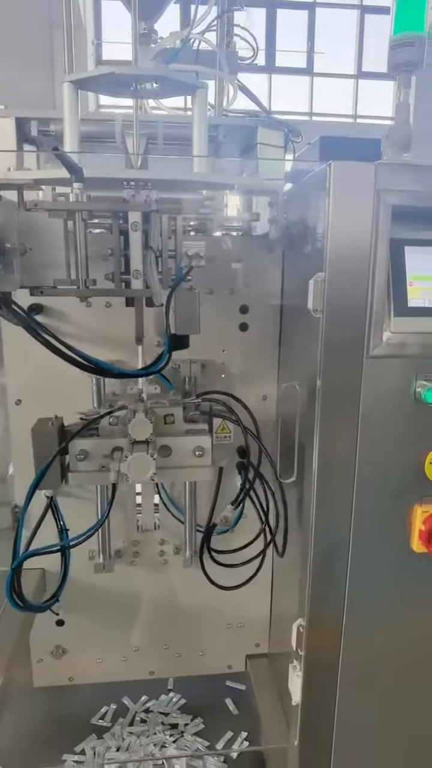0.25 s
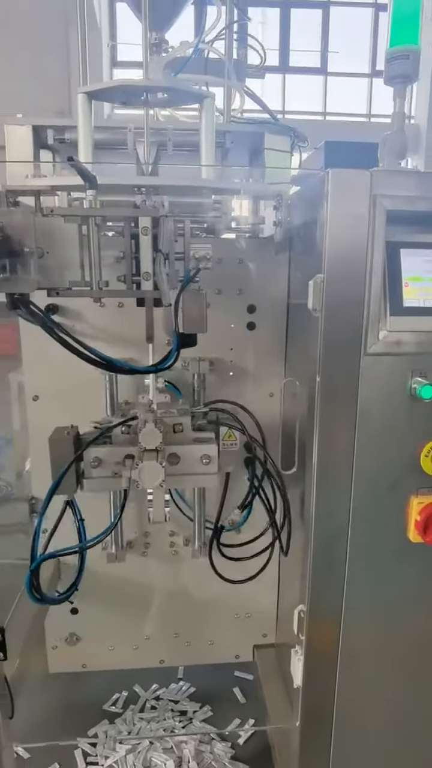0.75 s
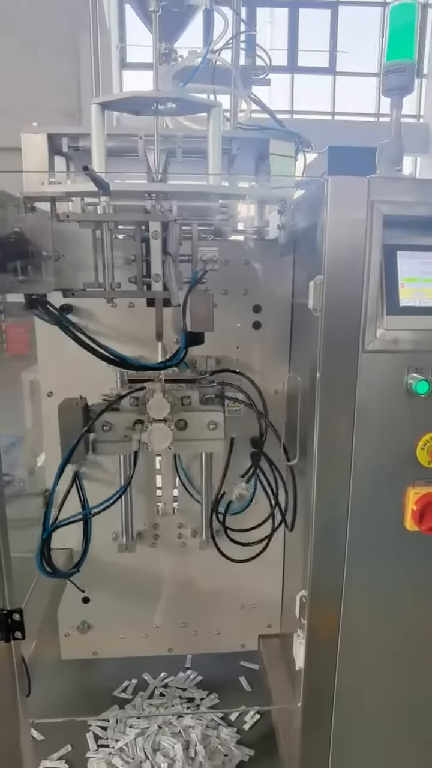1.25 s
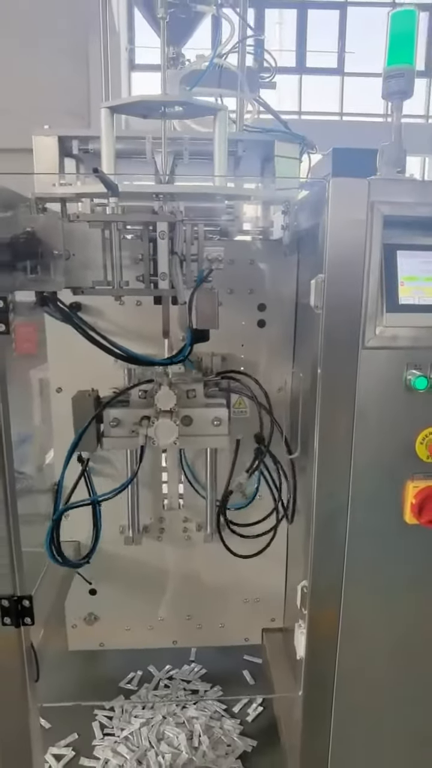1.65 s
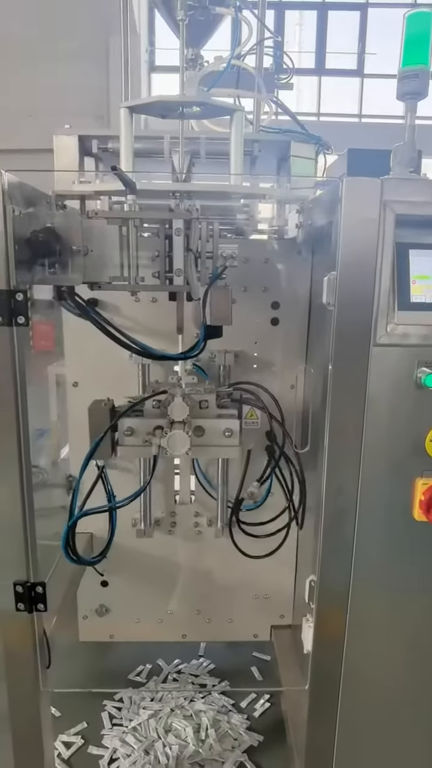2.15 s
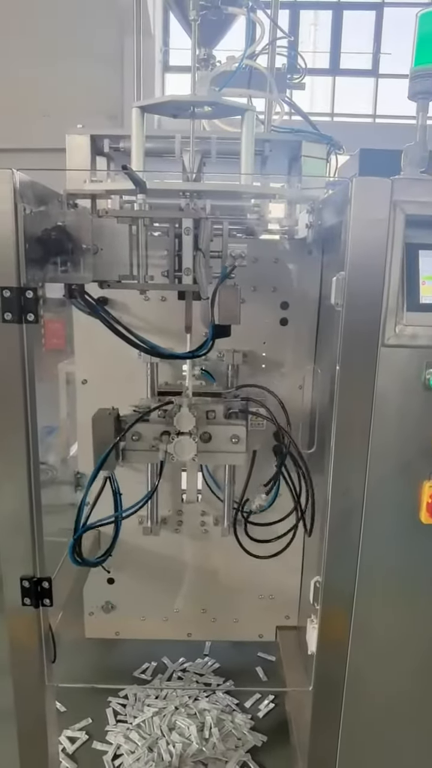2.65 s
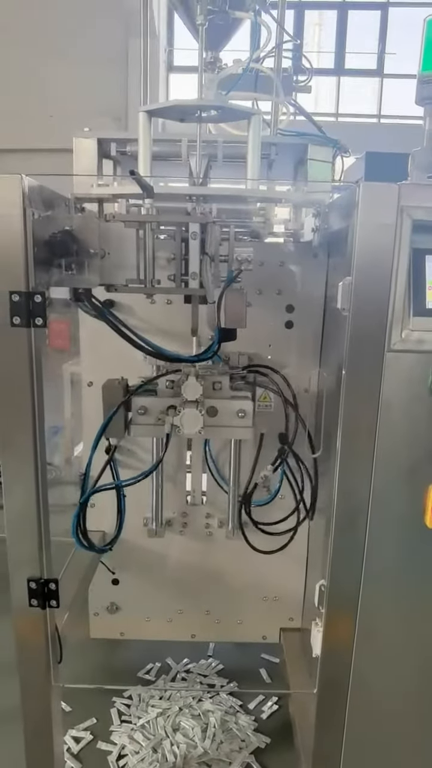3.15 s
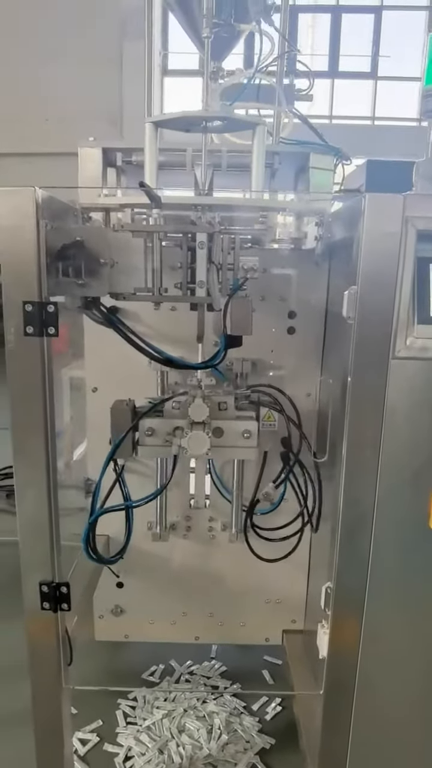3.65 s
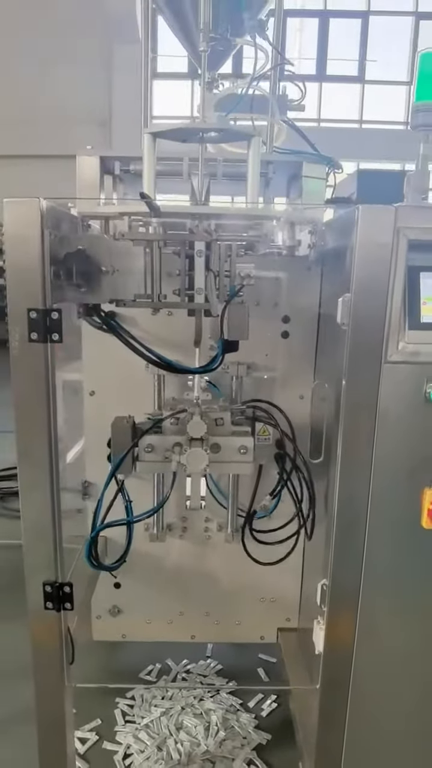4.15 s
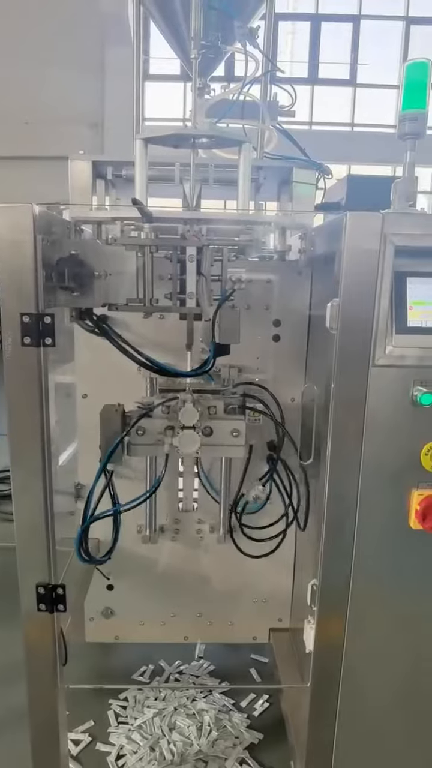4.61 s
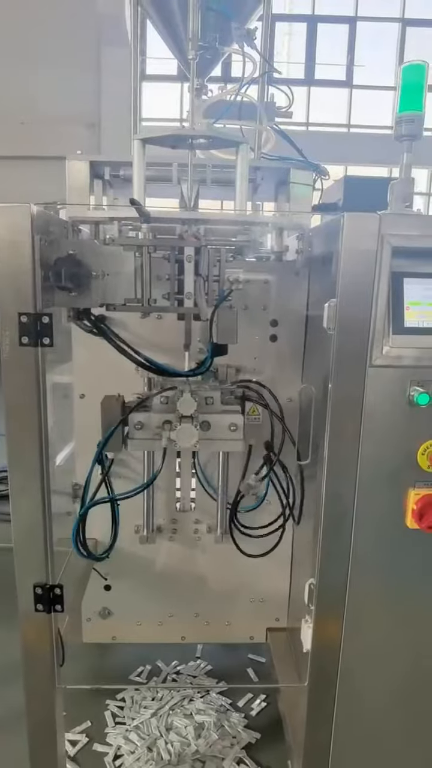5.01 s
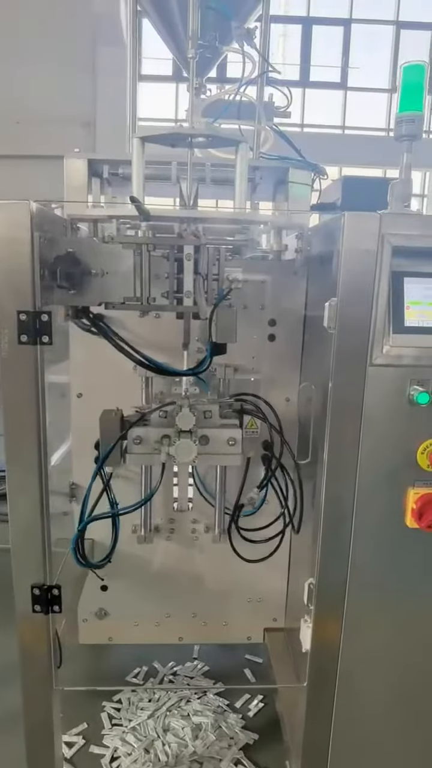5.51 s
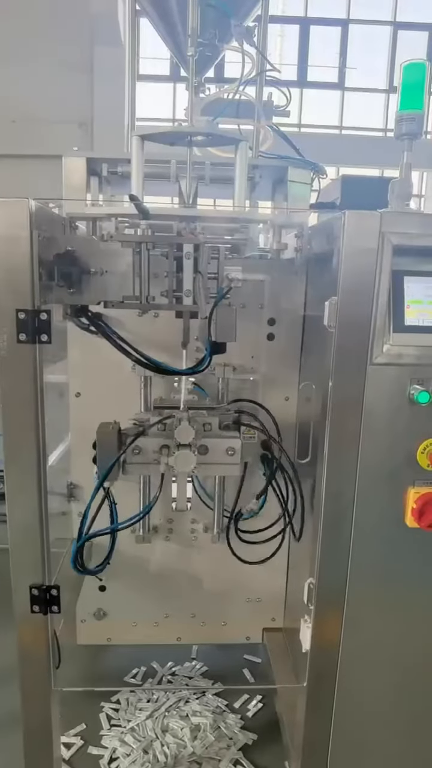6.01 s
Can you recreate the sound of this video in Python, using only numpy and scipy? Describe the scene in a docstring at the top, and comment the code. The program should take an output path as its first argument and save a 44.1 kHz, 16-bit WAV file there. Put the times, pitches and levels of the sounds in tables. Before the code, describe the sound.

Close to a packaging machine in a reverberant factory hall. A low drive rumble swells with each stroke. Every 1.7 seconds a bright metallic knife snap is followed by small hisses and knocks, a sharp blast of vented air, then the steel jaws clack shut with a hard thump. Half a second later they thump open, sometimes with an air puff. Faint squeaks and distant clatter fill the gaps.

```python
"""A stick packing machine, heard close in a factory hall: the drive rumbles in the hush and far clatter.
Pilot valves hiss, the knife snaps, feed knocks and squeaks follow; then a valve vents and the jaws clack shut.
They thump open as an air port puffs, and this repeats about every 1.7 s while the hall rings on.
Air and impacts are shaped noise, frame and steel are damped sine modes, the knife is noise through
resonances, the squeaks are gliding sines, and the hall is a convolved noise tail."""
import sys
import numpy as np
from scipy import signal
from scipy.fft import rfft, irfft, next_fast_len
from scipy.io import wavfile
from scipy.ndimage import uniform_filter1d, map_coordinates

SR = 44100
rng = np.random.default_rng(int(sys.argv[2]) if len(sys.argv) > 2 else 0)


def store_pcm(level_fs):
    """Save levels as 16-bit WAV."""
    pcm = np.round(np.clip(level_fs, -1, 1) * 32767).astype(np.int16)
    wavfile.write(sys.argv[1], SR, np.atleast_2d(pcm).T)


N = 276507
T = np.arange(SR * 4 // 10) / SR  # time axis of one short sound, 0.4 s


def amp(db):
    """Decibels to gain."""
    return 10 ** (np.asarray(db) / 20)


def unit(x):
    """Scale to rms 1."""
    return x / np.sqrt(np.mean(x ** 2) + 1e-20)


def along(points, hz):
    """Read (Hz, value) points on a log frequency axis."""
    point_hz, values = np.transpose(points)
    return np.interp(np.log(hz + 1), np.log(point_hz + 1), values)


def filtered(x, response):
    """Multiply the spectrum of x by a response of frequency."""
    size = next_fast_len(len(x) + 4096)
    spectrum = rfft(x, size) * response(np.fft.rfftfreq(size, 1 / SR))
    return irfft(spectrum, size)[:len(x)]


def noise(spectrum, size=len(T)):
    """Coloured noise of rms 1."""
    white = rng.standard_normal(size)
    return unit(filtered(white, lambda hz: amp(along(spectrum, hz))))


def wobble(rate, size=len(T)):
    """A smooth random curve with rate knots a second."""
    knots = rng.standard_normal(int(size * rate / SR) + 4)
    return map_coordinates(knots, [np.arange(size) * rate / SR])


def add(track, s, sound):
    """Mix a sound into the track at time s, trimmed to the track."""
    start = round(s * SR)
    sound = sound[max(-start, 0):]
    part = track[max(start, 0):][:len(sound)]
    part += sound[:len(part)]


def envelope(attack, hold, t60):
    """Rise, hold, then die away by 60 dB in t60 seconds."""
    return (1 - np.exp(-T / attack)) * amp(-60 * np.maximum(T - hold, 0) / t60)


def ring(modes, attack, scatter_db):
    """A struck body: damped sine modes, each level scattered at random by scatter_db."""
    hz, db, t60 = np.transpose(modes)[..., None]
    t = T[::4]  # the modes are low enough for a quarter of the sample rate
    level_db = db + scatter_db * rng.standard_normal(db.shape)
    swings = amp(level_db - 60 * t / t60) * np.sin(2 * np.pi * hz * t)
    struck = swings.sum(0) * (1 - np.exp(-t / attack))
    return signal.resample_poly(struck, 4, 1)[:len(T)]


def patchy(x, depth_db):
    """Narrow regions of the spectrum swell and fade on their own."""
    z = signal.stft(x, nperseg=4096, noverlap=3072)[2]
    field = uniform_filter1d(rng.standard_normal(z.shape), size=3, axis=0)
    field = uniform_filter1d(field, size=5, axis=1)
    varied = signal.istft(z * amp(depth_db * unit(field)), nperseg=4096, noverlap=3072)[1]
    return unit(varied[:N])


def cabinet(x, wet_db, t60):
    """Quick reflections between the steel panels comb a bright sound."""
    walls = rng.standard_normal(len(T)) * envelope(0.001, 0, t60)
    echo = signal.fftconvolve(x, walls / np.linalg.norm(walls))[:len(x)]
    return (x + amp(wet_db) * echo) / np.hypot(1, amp(wet_db))


def cycle_starts():
    """Each cycle begins with a vent; the machine is already one cycle under way."""
    starts = [row[0] for row in VENTS]
    return [starts[0] - np.mean(np.diff(starts))] + starts


def every_cycle(steps):
    """Repeat (delay, ..) steps in each cycle, as (seconds, ..) rows."""
    return [(start + delay, *rest) for start in cycle_starts() for delay, *rest in steps]


# Load on the drive in each cycle in turn. Each entry: change of its stroke levels in dB.
CYCLE_LOADS = [3, -4.5, 2, 1.5, 1]
# Two carriage strokes a cycle. Each row: delay after the vent in seconds, length in seconds,
# rumble in dB before the load.
CARRIAGE_STROKES = [(.22, 0.36, -48.5), (0.971, 0.3, -43)]


def drive_effort():
    """Gain of the rumble: idling, a rest while the jaws close, a swell for each carriage stroke."""
    idle_db, stroke_rise_s, stroke_t60_s = -50, .04, .9
    rest_dip_db, rest_at_s, rest_width_s = -18.5, 0.091, 0.073  # timed from the vent
    t = np.arange(N) / SR
    resting = sum(np.exp(-((t - start - rest_at_s) / rest_width_s) ** 2) for start in cycle_starts())
    power = np.full(N, amp(idle_db) ** 2)
    for start, load_db in zip(cycle_starts(), CYCLE_LOADS):
        for delay, length, db in CARRIAGE_STROKES:
            since = np.maximum(t - start - delay, 0)
            rise = 1 - np.exp(-since / stroke_rise_s)
            fade_db = -60 * np.maximum(since - length, 0) / stroke_t60_s
            power += (rise * amp(db + load_db + fade_db)) ** 2
    return np.sqrt(power) * amp(rest_dip_db * resting)


# Spectrum of the drive's rumble. Each row: frequency in Hz, level in dB.
RUMBLE = [(25, -53.5), (50, -30), (65, -14), (78, -15), (95, -10), (140, -9.5), (230, 0.5), (300, -4.5),
          (400, -10.5), (500, -28.5), (700, -43.5), (1500, -69.5)]


def drive():
    """The drive's low noise follows its effort, unsteady overall and from one band to the next."""
    unsteady = amp(2.5 * wobble(13, N))
    return drive_effort() * unsteady * patchy(noise(RUMBLE, N), depth_db=4)


# Spectrum of the hush of the hall. Each row: frequency in Hz, level in dB.
HUSH = [(60, -6), (300, -9.5), (600, 2.5), (950, 1), (1400, -5.5), (2300, -5.5), (3000, -17), (5000, -23.5),
        (8500, -10.5), (10000, -20), (11000, -36.5), (14000, -46.5)]
# Spectrum of dull contacts, near or far. Each row: frequency in Hz, level in dB.
KNOCK = [(200, 4), (500, -12), (950, 0), (1500, -2), (2500, -16.5), (5000, -13.5), (9000, -12.5),
         (14000, -44)]


def hall_background():
    """Far clatter, noise with a restless level, swells in the steadier hush of the hall."""
    hush = amp(-64.0 + 0.76 * wobble(5.4, N)) * noise(HUSH, N)
    clatter = amp(-72 + 3.3 * wobble(31, N)) * patchy(noise(KNOCK, N), depth_db=5.0)
    return hush + clatter


# Small pilot valves, switched alike in every cycle. Each row: delay after the vent in seconds,
# length in seconds, level in dB.
PILOTS = [(.615, .05, -45), (.694, .008, -42.5), (1.134, 0.057, -43), (1.237, 0.012, -38.5)]
# Spectrum of their hiss. Each row: frequency in Hz, level in dB.
PILOT_AIR = [(1000, -23), (3000, -16), (4500, -10), (7000, -7.5), (8400, 3.5), (9800, -2), (11500, -21),
             (13500, -13.5)]


def pilot_valves():
    """Little jets hiss inside the cabinet, in every cycle and again to release each puff."""
    air = np.zeros(N)
    lead_s, release_s, release_db = .044, .035, -42.5  # the valve opens ahead of its puff
    releases = [(s - lead_s, release_s, release_db) for s, *_ in PUFFS]
    for s, length, db in every_cycle(PILOTS) + releases:
        hiss = amp(db) * noise(PILOT_AIR) * envelope(0.0046, length, 0.25)
        add(air, s, cabinet(hiss, wet_db=1.0, t60=0.0064))
    return air


# Knife snaps. Each row: time of the snap in seconds, relative level in dB.
SNAPS = [(0.033, -14.5), (1.763, -15.5), (3.4961, -13.5), (5.225, -16)]
# Resonances of the knife's steel. Each row: frequency in Hz, width in Hz, level in dB.
KNIFE = [(1918, 81, -14.5), (2420, 66, -31.5), (3223, 72, -19.5), (3780, 110, -21.5), (5140, 43, -16),
         (5715, 200, -16.5), (8500, 340, -10.5), (9210, 120, -2.5), (10500, 260, -19.5),
         (13740, 710, -41.5)]
# Spectrum of hard metal contact. Each row: frequency in Hz, level in dB.
CLACK = [(200, -2.5), (500, -3.5), (1000, 3), (2000, 0.5), (4200, -4.5), (6000, 1), (9000, 8.5),
         (10500, -0.5), (12000, -21.5), (14000, -3)]


def knife_steel(hz):
    """Response of the blade: resonances side by side, alternating in sign."""
    response = 0
    for k, (centre, width, db) in enumerate(KNIFE):
        damping = 1j * hz * width
        response = response + (-1) ** k * amp(db) * damping / (centre * centre - hz * hz + damping)
    return response


def knife():
    """The blade scrapes through the film and snaps against its stop; both set its steel ringing."""
    out = np.zeros(N)
    for s, db in SNAPS:
        scrape = amp(-3.5) * envelope(0.0016, 0.0088, 0.047)
        snap = np.exp(-((T - .0042) / 0.001) ** 2)
        ringing = filtered((scrape + snap) * rng.standard_normal(len(T)), knife_steel)
        add(out, s - .0045, amp(db - 22.5) * unit(ringing))
        add(out, s - .003, amp(db - 18.5) * noise(CLACK) * envelope(0.0014, 0.0016, 0.092))
        add(out, s - .003, amp(db - 29) * noise(KNOCK) * envelope(0.0012, 0.0036, 0.22))
    return out


# Recoil of the frame at a knife snap, a vent and a puff.
# Each row: delay in seconds, frequency in Hz, level in dB.
SNAP_RECOIL = [(.003, 134, -38.5)]
VENT_RECOIL = [(.001, 124.8, -40.5)]
PUFF_RECOIL = [(.002, 361, -32), (.012, 208.3, -26.5)]
# Swings of the carriage after the jaws open. Each row: delay in seconds, frequency in Hz,
# level in dB relative to that opening's settling level.
SETTLING = [(.03, 141.4, 0.5), (.05, 104.2, -3), (.108, 169, -8)]


def thuds():
    """Soft low damped swings follow each knife snap, vent, puff and opening of the jaws."""
    out = np.zeros(N)
    shoves = [(s, settling_db, SETTLING) for s, _, _, settling_db in OPEN]
    for events, recoil in (SNAPS, SNAP_RECOIL), (PUFFS, PUFF_RECOIL), (VENTS, VENT_RECOIL):
        shoves += [(s, 0, recoil) for s, *_ in events]
    for s, shove_db, swings in shoves:
        for delay, hz, db in swings:
            swing = np.sin(2 * np.pi * hz * T) * envelope(0.0031, 0, 0.17)
            add(out, s + delay, amp(shove_db + db) * swing)
    return out


# Light knocks of the film feed in every cycle. Each row: delay after the vent in seconds, level in dB.
FEED_KNOCKS = [(.39, -58.5), (.847, -45.5), (1.347, -46)]
# Stray knocks, as of falling packs. Each row: start in seconds, level in dB.
STRAY_KNOCKS = [(0.454, -52), (3.976, -46.5), (4.643, -45.5), (5.687, -49.5)]


def knocks():
    """Light dull contacts between the main strokes: short bursts of dull noise."""
    out = np.zeros(N)
    for s, db in every_cycle(FEED_KNOCKS) + STRAY_KNOCKS:
        add(out, s, amp(db) * noise(KNOCK) * envelope(.0015, 0, 0.12))
    return out


# Faint squeaks of sliding parts. Each row: start in seconds, length in seconds,
# start pitch in Hz, end pitch in Hz, level in dB.
SQUEAKS = [(0.305, 0.089, 596, 510, -50), (2.245, .085, 499, 441, -46.5), (2.464, 0.14, 768, 730, -46.5),
           (3.969, 0.038, 950, 910, -49), (5.063, 0.13, 381, 427.5, -42)]


def squeaks():
    """Sliding parts squeak: short wavering glides that swell and fade."""
    out = np.zeros(N)
    for s, length, start_hz, end_hz, db in SQUEAKS:
        progress = np.minimum(T / length, 1)
        glide = start_hz + (end_hz - start_hz) * progress
        pitch = glide * (1 + 0.045 * wobble(130))
        tone = np.sin(2 * np.pi * np.cumsum(pitch) / SR)
        add(out, s, amp(db) * np.sin(np.pi * progress) * tone)
    return out


# Main valve vents. Each row: start in seconds, length in seconds, relative level in dB,
# pressure sag in dB per second.
VENTS = [(0.568, 0.118, -17.5, 16.5), (2.297, 0.11, -17, 39), (4.03, 0.12, -16.5, 35.5),
         (5.761, 0.11, -17, 26)]
# Spectrum of the vented air. Each row: frequency in Hz, level in dB.
VENT_AIR = [(150, -25), (900, -37.5), (1500, -27.5), (2400, -17), (3300, -17.5), (5000, -15), (5900, -7),
            (7000, -8), (8200, 0.5), (9000, 1), (9900, -2.5), (10700, -12), (12000, -17.5), (14000, -12.5)]


def vents():
    """Each vent opens with the spool's tick, blows hard, then bleeds while the piston travels."""
    air = np.zeros(N)
    for s, length, db, sag_db in VENTS:
        blast = envelope(0.0038, length, 0.09) * amp(-sag_db * T)
        bleed = amp(-14.0) * envelope(0.19, 0.22, 0.16)
        flutter = amp(wobble(90) + 0.42 * wobble(460))
        tick = amp(-16.0) * noise(KNOCK) * envelope(.001, 0, 0.047)
        rush = noise(VENT_AIR) * flutter * (blast + bleed)
        add(air, s, cabinet(amp(db) * (rush + tick), wet_db=-5, t60=0.035))
        # air seeps past the spool as it starts to move
        seep = np.minimum(T / 0.025, 1) * envelope(0.0057, 0.01, .02)
        add(air, s - .009, amp(db - 10.5) * noise(VENT_AIR) * seep)
    return air


# Jaws shut. Each row: start in seconds, thump in dB, clack in dB, both relative.
SHUT = [(.789, 1, 0), (2.519, 1, 0.5), (4.242, -1, 0), (5.979, -1, -1)]
# Jaws open. Each row: start in seconds, relative thump in dB, relative clack in dB, settling in dB.
OPEN = [(1.321, -1, -6.5, -26.5), (3.049, -0.5, -8.5, -21.5), (4.777, 0, -5, -26)]
# Contacts of one stroke, shutting and opening. Each row: delay in seconds, thump in dB, clack in dB.
SHUT_CONTACTS = [(.0004, 2, -9), (.005, -45, -2), (0.0188, -10, -14.5), (0.0271, -4, -22)]
OPEN_CONTACTS = [(.0027, 1.5, -1.5), (.0301, -2.5, -5.5), (0.0433, -5.5, -15)]
# Modes of the frame with the jaws pressed together, and with the jaws on their stops.
# Each row: frequency in Hz, level in dB, 60 dB decay in seconds.
FRAME_SHUT = [(125, -34, 0.051), (142.7, -28, 0.23), (177.2, -8, 0.056), (200, -16.5, 0.22),
              (286.6, -19, 0.24), (321.3, -36, 1), (350.3, -28, 0.24), (392.6, -31.5, 0.18),
              (468, -39.5, 0.18)]
FRAME_OPEN = [(94, -34, .3), (129.3, -27.5, 0.38), (179.4, -19.5, 0.15), (244.6, -2.5, 0.052),
              (265.5, -18.5, 0.19), (294.3, -30.5, 0.19), (326.6, -37, 0.43)]
# Modes of the jaws' steel. Each row: frequency in Hz, level in dB, 60 dB decay in seconds.
JAW = [(674.6, -33, 0.13), (753, -34, 0.066), (913, -26.5, 0.047), (939, -32, 0.11), (1056, -36.5, 0.069),
       (1137, -49.5, 0.046), (1407, -46.5, 0.21), (1679, -30, 0.095), (2304, -36, 0.12), (2946, -30, 0.06),
       (3130, -35, 0.11), (3520, -38.5, .08)]


def jaws(strokes, contacts, frame, ring_db, crack_db):
    """The jaws land and rebound: at every contact the frame thumps and the steel cracks and rings."""
    blows, rings = np.zeros(N), np.zeros(N)
    for s, thump_db, clack_db, *_ in strokes:
        thump = ring(frame, attack=0.0068, scatter_db=0.0)
        for delay, push_db, hit_db in contacts:
            contact_db = clack_db + hit_db
            crack = amp(contact_db + crack_db) * noise(CLACK) * envelope(0.0013, 0, 0.11)
            add(blows, s + delay, amp(thump_db + push_db) * thump + crack)
            # the steel rings at each contact with a slight random shift in time
            shift_s = 0.00046 * rng.standard_normal()
            steel = ring(JAW, attack=0.0038, scatter_db=0.5)
            add(rings, s + delay + shift_s, amp(contact_db + ring_db) * steel)
    return blows, rings


def crimp():
    """The serrated sealing faces chatter briefly as they bite the film, over a dense dry knock."""
    out = np.zeros(N)
    for s, _, clack_db in SHUT:
        add(out, s + .006, amp(clack_db - 23.5) * noise(VENT_AIR) * envelope(0.0027, 0.008, 0.12))
        add(out, s + .004, amp(clack_db - 34.0) * noise(KNOCK) * envelope(0.00078, 0.0023, 0.049))
    return out


# Short puffs from a cylinder port. Each row: start in seconds, relative level in dB,
# 60 dB decay in seconds, whistle in dB relative to the puff's level.
PUFFS = [(1.308, -16.5, 0.1, -34), (3.313, -20.5, 0.17, -13.5), (4.772, -12.5, 0.06, -35)]
# Spectrum of the puffed air. Each row: frequency in Hz, level in dB.
PUFF_AIR = [(500, -26), (2000, -18.5), (3500, -21), (5000, -15), (6100, -6), (7300, -6.5), (8200, -0.5),
            (9500, -7.5), (11000, -23), (14000, -27)]


def puffs():
    """Air bursts from the port at once and dies away, coloured by the cabinet."""
    air = np.zeros(N)
    for s, db, t60, _ in PUFFS:
        burst = amp(db) * noise(PUFF_AIR) * envelope(0.0014, 0, t60)
        add(air, s, cabinet(burst, wet_db=-2.5, t60=0.024))
    return air


# Pipe resonance of the port. Each row: frequency in Hz, level in dB.
WHISTLE = [(1200, -15.5), (2000, -7.5), (2350, 5.5), (2700, -12), (3600, -14), (5000, -29.5)]


def whistles():
    """Each puff briefly sounds the pipe of its port: noise shaped by the pipe's resonance."""
    out = np.zeros(N)
    for s, db, _, whistle_db in PUFFS:
        add(out, s, amp(db + whistle_db) * noise(WHISTLE) * envelope(.008, .02, .12))
    return out


# Reverberation of the hall. Each row: frequency in Hz, 60 dB decay in seconds.
HALL_T60 = [(100, 1.2), (230, 2.35), (330, 1.7), (600, 1.4), (2500, 1.06), (5500, 0.85), (9000, 0.65),
            (14000, 0.23)]
# Strength of the hall's tail. Each row: frequency in Hz, level in dB.
HALL_SEND = [(100, -11.5), (240, -15.5), (330, -4.5), (430, -5), (650, -6), (1000, -8), (2500, -3.5),
             (6000, -9), (9000, -15.5), (14000, -21)]


def hall(x):
    """The hall's tail: noise decaying band by band, long in the bass and short in the treble."""
    hz, t, z = signal.stft(rng.standard_normal(2 * SR), SR, nperseg=512)
    decay = amp(-60 * t / along(HALL_T60, hz)[:, None]) * (1 - np.exp(-t / 0.0078))
    band_rms = np.sqrt(np.mean(decay ** 2, axis=1, keepdims=True))
    decay *= amp(along(HALL_SEND, hz))[:, None] / band_rms
    tail = signal.istft(z * decay, SR, nperseg=512)[1]
    return signal.fftconvolve(x, tail / np.sqrt(len(tail)))[:N]


def valves():
    """All the air the machine lets go."""
    return pilot_valves() + vents() + puffs()


def scene():
    """The machine near the microphone; the air it vents in other directions returns from the hall."""
    shut_blows, shut_rings = jaws(SHUT, SHUT_CONTACTS, FRAME_SHUT, ring_db=1, crack_db=-22.0)
    open_blows, open_rings = jaws(OPEN, OPEN_CONTACTS, FRAME_OPEN, ring_db=-4.0, crack_db=-21.5)
    knocking = shut_blows + open_blows + crimp() + knocks() + thuds()
    ringing = shut_rings + open_rings + knife() + whistles() + squeaks()
    near = valves() + knocking + ringing
    # the air noise is drawn afresh for the hall; ringing sounds reach it 7.5 dB weaker
    far = hall(valves() + knocking + amp(-7.5) * ringing)
    return (near + far + drive() + hall_background())[None]


def record(dry):
    """The deep bass is thinned, and the sound ends sharply above 14.1 kHz."""
    low_cut_hz, top_hz = 68, 14100
    high_pass = signal.butter(3, low_cut_hz, "highpass", fs=SR, output="sos")
    thin = signal.sosfilt(high_pass, dry[0])
    return filtered(thin, lambda hz: 1 / np.sqrt(1 + (hz / top_hz) ** 500))[None]


dry = scene()
out = record(dry)
store_pcm(out)
```